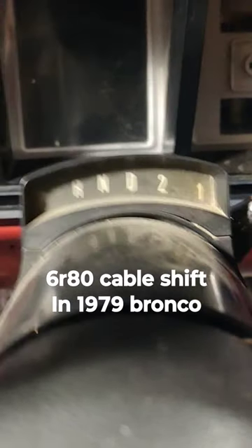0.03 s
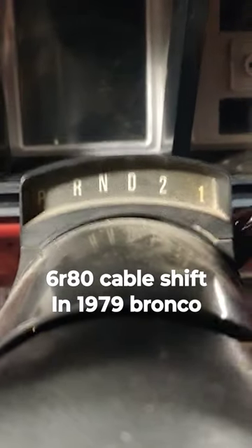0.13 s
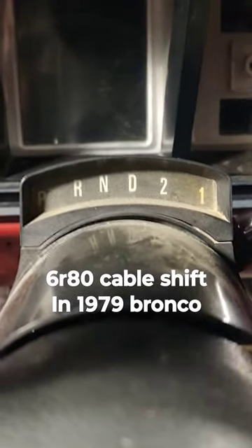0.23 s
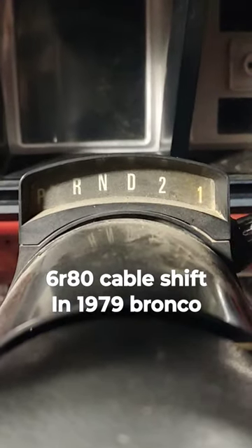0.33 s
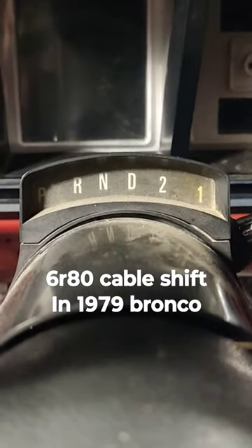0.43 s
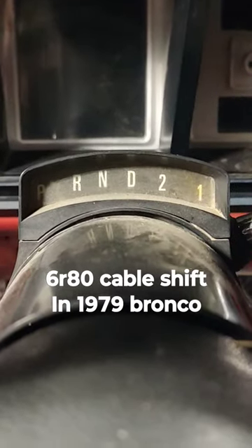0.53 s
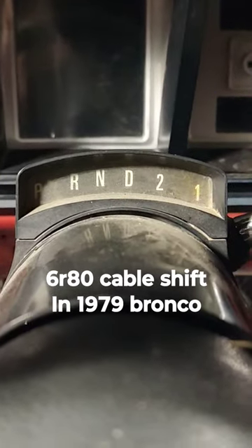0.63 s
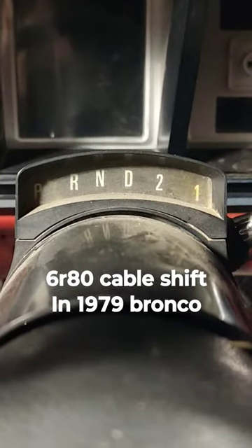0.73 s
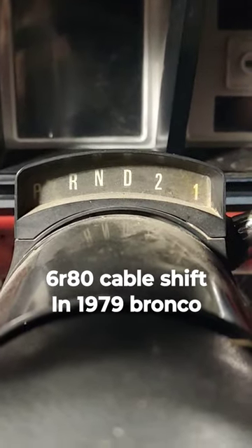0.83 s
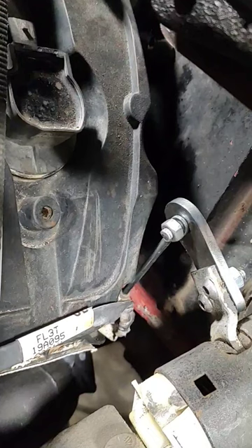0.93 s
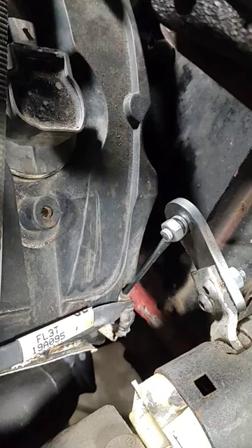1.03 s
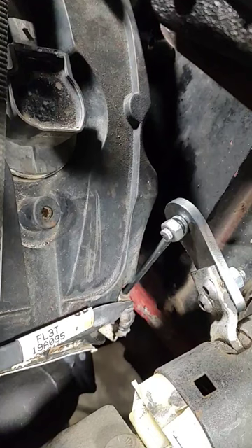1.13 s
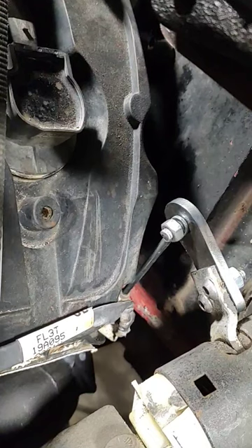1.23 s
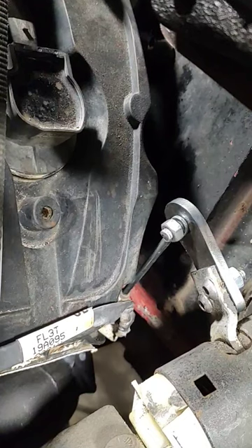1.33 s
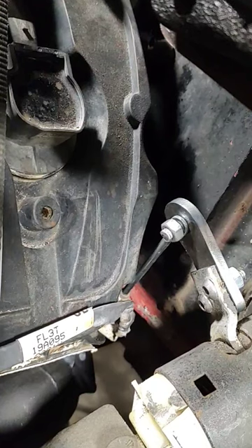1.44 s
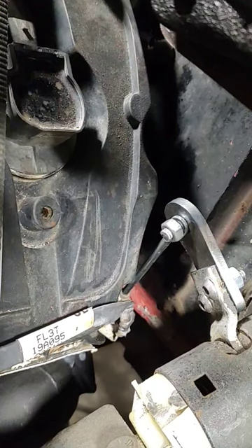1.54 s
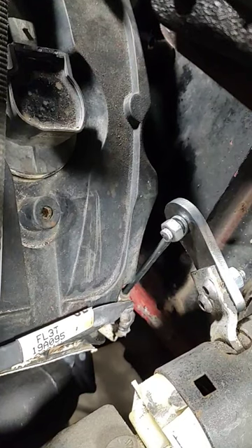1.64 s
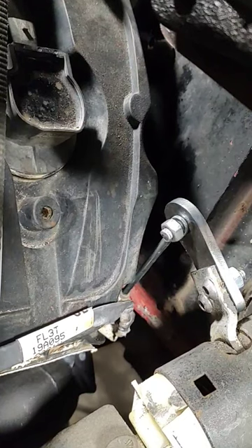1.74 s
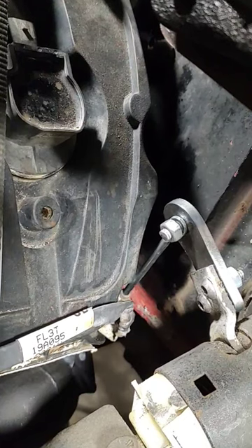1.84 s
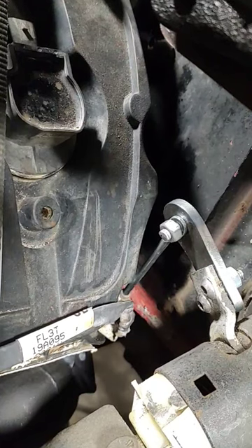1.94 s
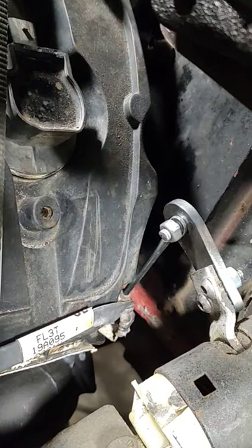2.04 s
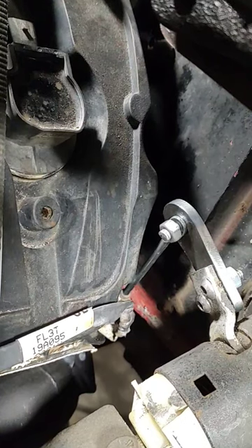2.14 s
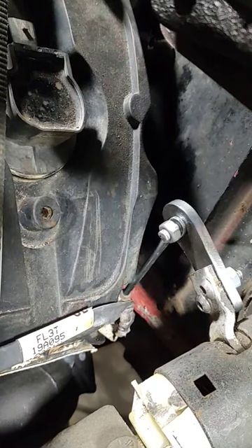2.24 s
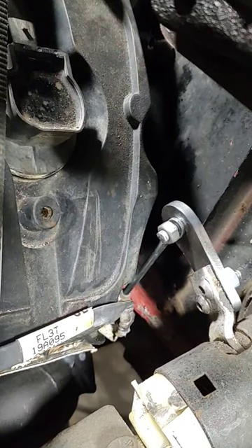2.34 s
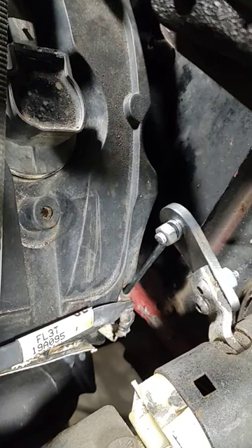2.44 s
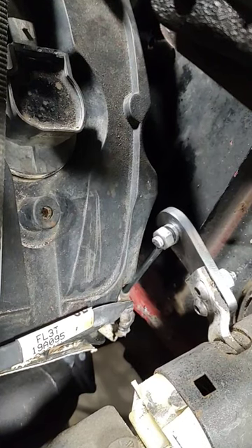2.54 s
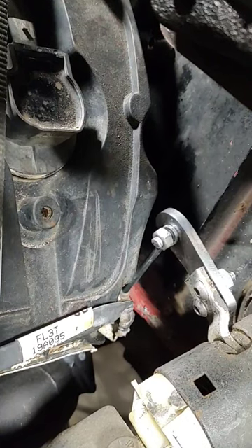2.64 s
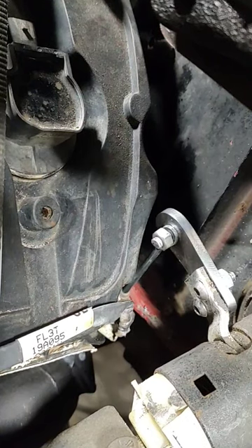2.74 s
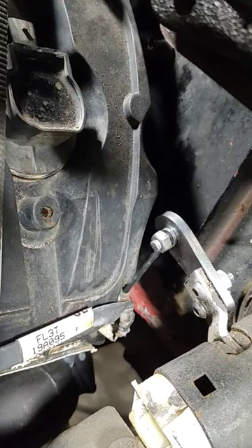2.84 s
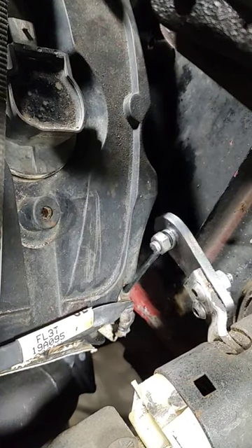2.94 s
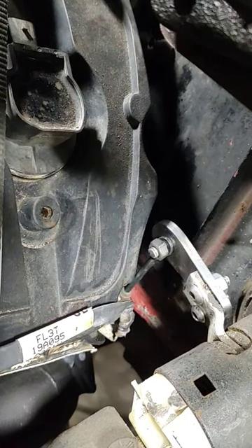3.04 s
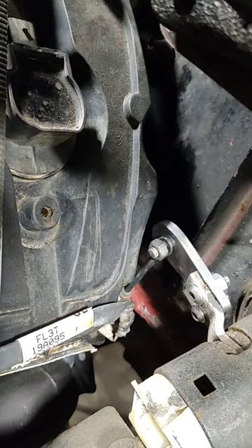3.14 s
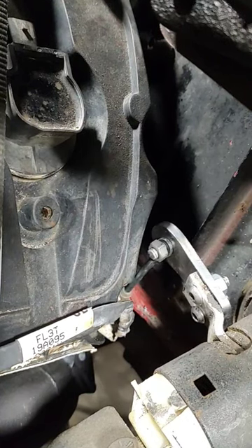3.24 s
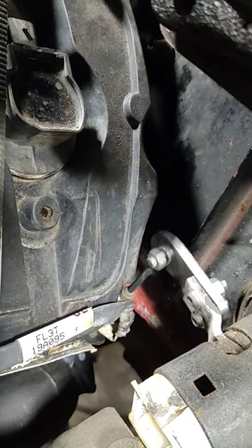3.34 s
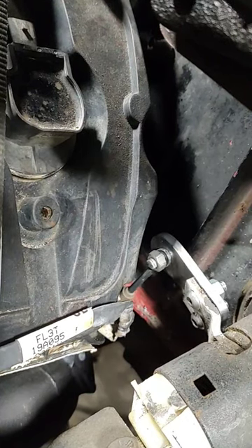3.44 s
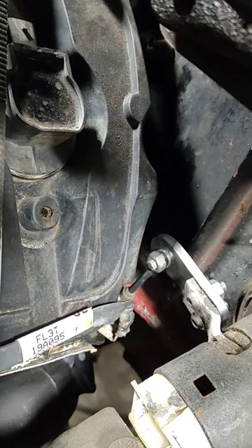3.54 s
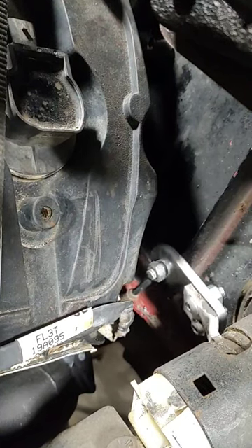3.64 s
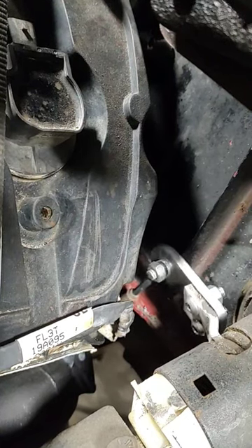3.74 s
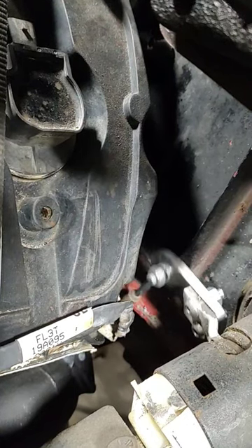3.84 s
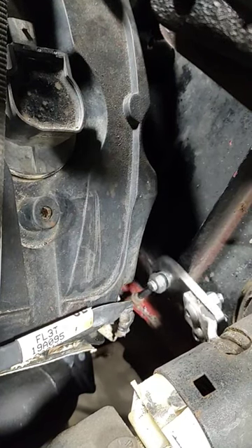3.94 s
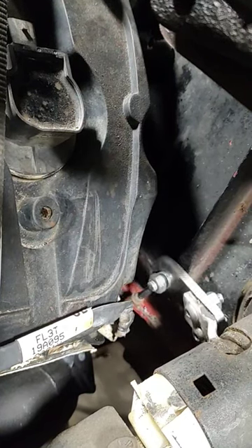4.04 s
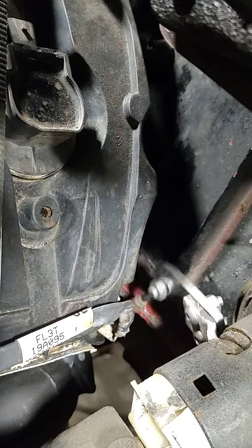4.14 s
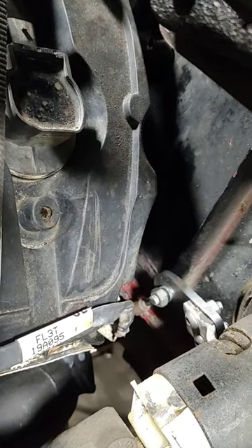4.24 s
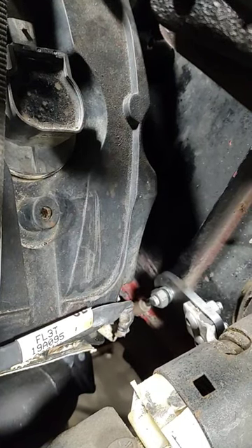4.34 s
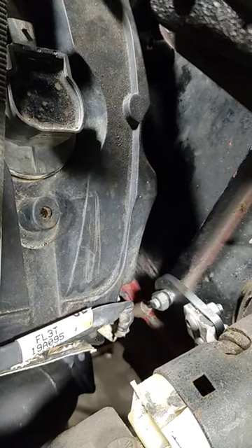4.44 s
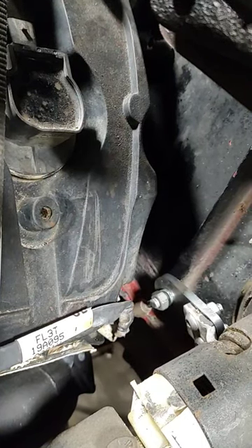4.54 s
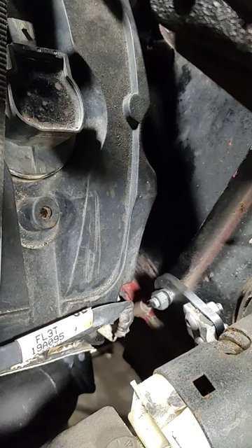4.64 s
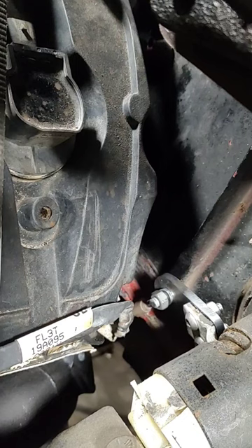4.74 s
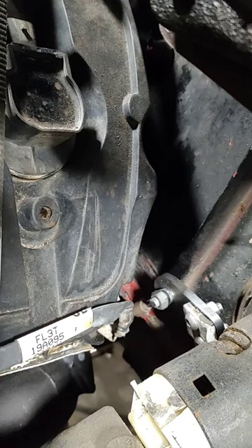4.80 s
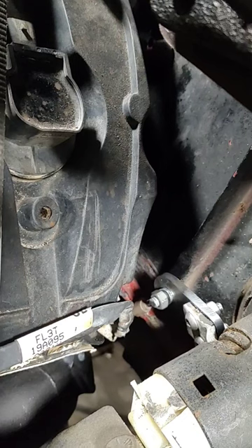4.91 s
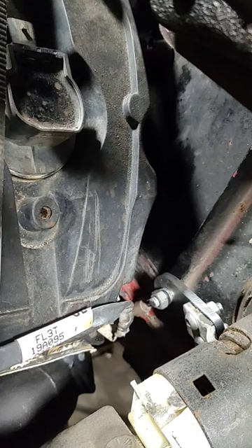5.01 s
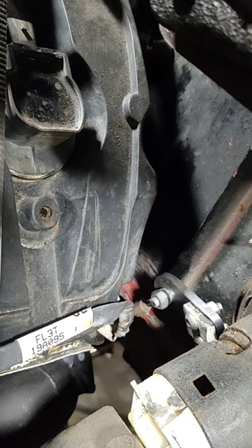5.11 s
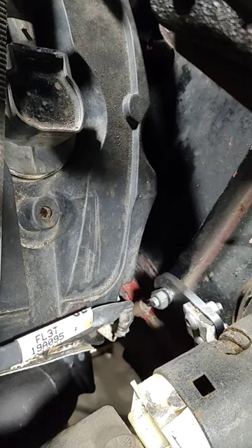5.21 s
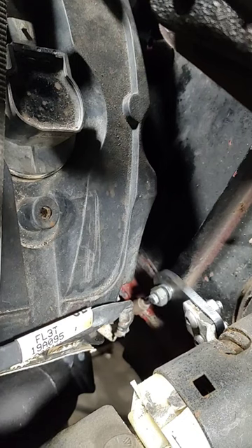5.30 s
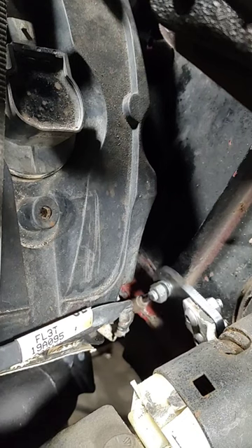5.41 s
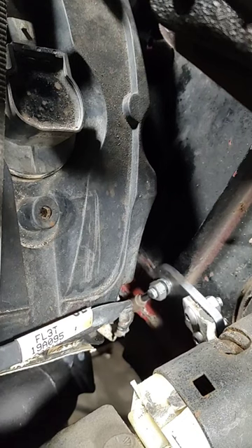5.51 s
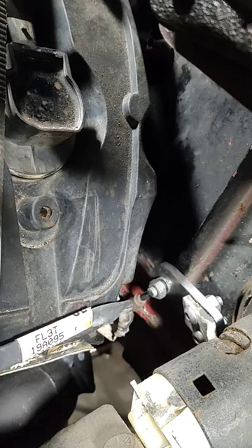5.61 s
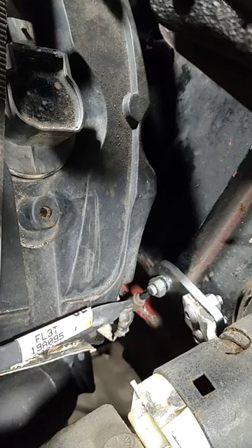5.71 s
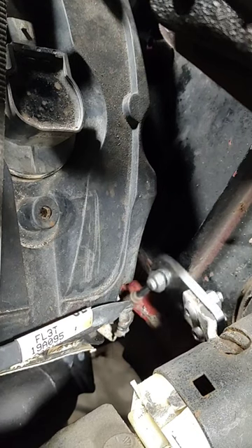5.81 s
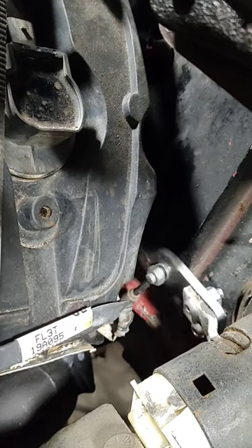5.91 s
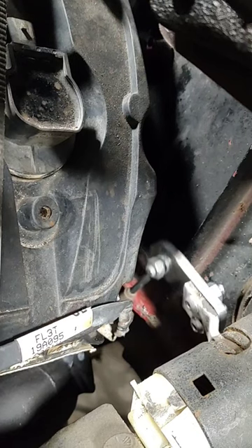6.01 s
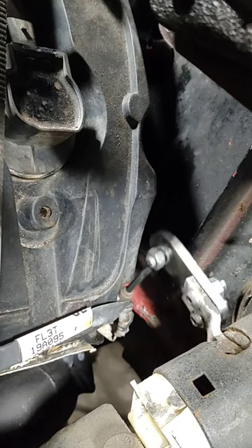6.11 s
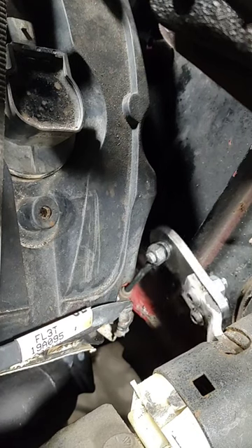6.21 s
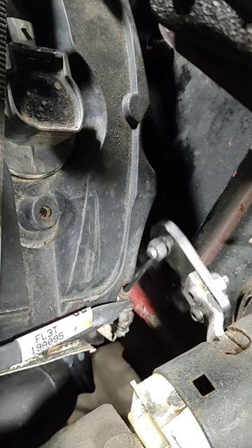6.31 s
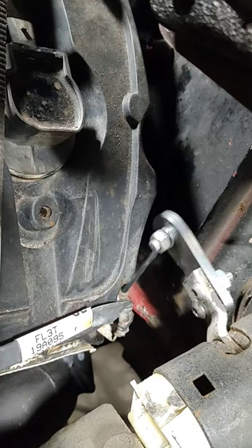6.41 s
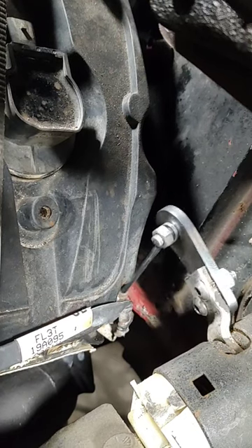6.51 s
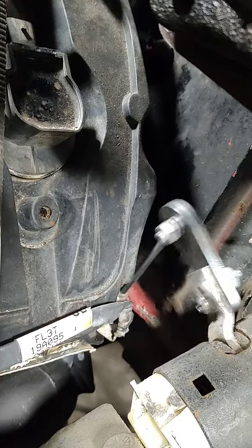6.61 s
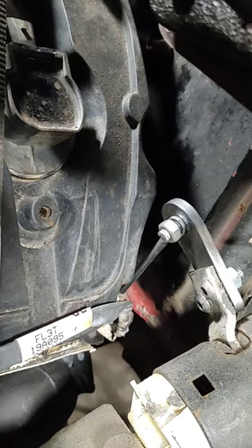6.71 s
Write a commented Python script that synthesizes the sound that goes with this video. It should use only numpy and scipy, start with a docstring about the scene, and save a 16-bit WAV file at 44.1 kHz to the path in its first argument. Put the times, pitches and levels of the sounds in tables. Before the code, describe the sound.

Quick loose shifter clatter, a tiny silence, then spaced hard metallic clacks of a gearbox linkage over a very faint workshop hum.

```python
"""A steel lever under a truck is pulled from detent to detent by a cable: each detent is a short chatter of contacts,
most with one firm knock as the part seats, ringing floor pan, gearbox case and brackets; between them the linkage
drags and shakes. Before that, and a short silence, a column gear lever is rattled in the cab: contacts ring shroud
and shift tube over a low boom. Filtered noise makes the room floor, wavering sines the hum of workshop lamps."""
import sys
import numpy as np
from scipy import signal
from scipy.fft import rfft, irfft, next_fast_len
from scipy.io import wavfile

SR = 44100
rng = np.random.default_rng(int(sys.argv[2]) if len(sys.argv) > 2 else 0)


def store_wav(level_fs):
    """Save 16-bit WAV to argv[1]."""
    pcm = np.round(np.clip(np.atleast_2d(level_fs), -1, 1) * 32767)
    wavfile.write(sys.argv[1], SR, pcm.T.astype(np.int16))


N = 298116
T_S = np.arange(N) / SR
HALF = np.array([[.5], [-.5]])   # splits a left-right difference over the channels
CAB_END_S, TRUCK_START_S = 0.84, 0.876   # silence between


def from_db(db):
    """Amplitude of a level in dB."""
    return np.exp(np.asarray(db) * (np.log(10) / 20))


def rms_one(x):
    """Scale to rms 1."""
    return x / np.sqrt(np.mean(x ** 2) + 1e-20)


def at_hz(points, hz):
    """Read a spectrum table on a log-frequency axis."""
    table_hz, values = np.transpose(points)
    return np.interp(np.log(hz), np.log(table_hz), values)


def shaped(x, gain):
    """Filter by a complex gain given as a function of Hz."""
    size = next_fast_len(N + SR)
    hz = np.maximum(np.fft.rfftfreq(size, 1 / SR), 1)
    return irfft(rfft(x, size) * gain(hz), size)[..., :N]


def band(x, low_hz, high_hz):
    """Butterworth band-pass."""
    return signal.sosfilt(signal.butter(2, [low_hz, high_hz], "band", fs=SR, output="sos"), x)


def highpass(x, hz):
    """Second-order Butterworth high-pass."""
    return signal.sosfilt(signal.butter(2, hz, "high", fs=SR, output="sos"), x)


def wander(knots_per_s):
    """Slow random curve: normal values joined by straight lines."""
    knots = rng.standard_normal(8 * knots_per_s)
    return np.interp(T_S, np.arange(len(knots)) / knots_per_s, knots)


def held(rows, column):
    """A column's value, held from each row's start to the next."""
    starts_s, values = np.array(rows)[:, [0, column]].T
    row = np.searchsorted(starts_s - .01, T_S) - 1
    return values[np.maximum(row, 0)]


def peak(at_s, db, swell_db_per_s, fade_db_per_s):
    """Envelope that swells to one moment and fades, straight in dB."""
    t_s = T_S - at_s
    return from_db(db + np.minimum(swell_db_per_s * t_s, -fade_db_per_s * t_s))


def contacts(per_s, spread_db, shared):
    """Random clicks of uneven size; a share is heard by both ports, the rest by one only; rms 1."""
    uneven_db = spread_db * np.minimum(rng.exponential(1, (3, N)), 4)
    sizes = from_db(uneven_db) * rng.choice([-1, 1], (3, N))
    clicks = sizes * (rng.random((3, N)) < per_s / SR)
    return rms_one(np.sqrt(shared) * clicks[0] + np.sqrt(1 - shared) * clicks[1:])


def blows(rows, column, rise_s, share=1):
    """Stereo force envelope: each blow rises quickly to its peak, then chatters out."""
    t_s = np.arange(SR // 4) / SR - .03
    out = np.zeros((2, N + SR))
    for row in rows:
        start_s, blow_db, chatter_s, left_right_db = row[0], row[1], row[4], row[5]
        decay_s = np.clip(share * chatter_s, .002, .05)
        shape = np.exp(np.minimum(t_s / rise_s, -t_s / decay_s))
        shape = shape * (1 + 0.5 * np.exp(-np.abs(t_s) / 0.00072))   # first contacts are hardest
        part_db = row[column] if column > 1 else 0   # parts are relative to the blow
        at = round((start_s + t_s[0] + rise_s) * SR)
        out[:, at:at + len(t_s)] += from_db(blow_db + part_db + HALF * left_right_db) * shape
    return out[:, :N]


# spectrum of bare contact noise: pitch_hz [Hz], density_db [dB per Hz, relative]
TICK_SPECTRUM = [(35, -56), (60, -25.5), (118, -34.5), (227, -6.5), (458, 9.5), (579, 7.5), (1040, 4),
                 (3420, -17.5), (6000, -35), (14900, -44.5), (16000, -30.5)]


def bare(force, low_hz, high_hz, per_s, spread_db, shared):
    """Contact noise that rings nothing: clicks through one short band-limited pulse."""
    impulse = np.eye(1, N, 64)[0]
    click = shaped(impulse, lambda hz: from_db(at_hz(TICK_SPECTRUM, hz)))
    click = band(band(click, low_hz, high_hz), low_hz, high_hz)[:4096]   # twice, for steep skirts
    click = click / np.sqrt(np.sum(click ** 2))
    clicks = force * contacts(per_s, spread_db, shared)
    return signal.fftconvolve(clicks, click[None], axes=1)[:, :N]


def resonate(x, hz, t60_s):
    """One damped mode as a two-pole resonator."""
    r, w = from_db(-60 / (t60_s * SR)), 2 * np.pi * hz / SR
    return signal.lfilter([0, np.sin(w)], [1, -2 * r * np.cos(w), r * r], x)


def ring(force, modes, per_s, spread_db, shared, favoured_hz=None, db_per_octave=0, shorter=1):
    """Contacts under a force envelope ring the modes; mode shares shift as the contact point moves."""
    hz, mode_db, t60_s = np.transpose(modes)
    t60_s = shorter * t60_s
    share_db = mode_db[:, None] + [2.5 * wander(8) for _ in modes]
    if favoured_hz is not None:
        share_db = share_db - db_per_octave * np.abs(np.log2(hz[:, None] / favoured_hz))
    share = from_db(share_db)
    loss = 1 - from_db(-60 / (t60_s * SR))
    power = np.sum(share ** 2 / (4 * loss[:, None]), axis=0)   # keeps the level when shares shift
    clicks = force * contacts(per_s, spread_db, shared) / np.sqrt(power) + 1e-18
    return sum(resonate((-1) ** k * share[k] * clicks, hz[k], t60_s[k]) for k in range(len(modes)))


# left-right likeness of diffuse sound: pitch_hz [Hz], likeness [0 to 1]
DIFFUSE_LIKENESS = [(60, .9), (300, .85), (650, .7), (1100, .05), (15000, .02)]


def diffuse(spectrum):
    """Stereo noise of rms 1, most alike in both channels in the bass."""
    mid, side = rng.standard_normal((2, N))
    mid = shaped(mid, lambda hz: spectrum(hz) * np.sqrt(1 + at_hz(DIFFUSE_LIKENESS, hz)))
    side = shaped(side, lambda hz: spectrum(hz) * np.sqrt(1 - at_hz(DIFFUSE_LIKENESS, hz)))
    return rms_one(mid + side * [[1], [-1]])


# room floor spectrum: pitch_hz [Hz], density_db [dB per Hz, relative]
FLOOR_SPECTRUM = [(30, -53.5), (70, -29), (120, -17), (200, -12.5), (400, -12.5), (900, -14.5),
                  (2000, -26.5), (3500, -23.5), (6000, -37.5), (10000, -41.5), (14500, -37.5), (16500, -42)]


def floor():
    """Distant room noise: diffuse noise under a fixed spectrum."""
    floor_db = -74
    return from_db(floor_db) * diffuse(lambda hz: from_db(at_hz(FLOOR_SPECTRUM, hz)))


# lamp ballast tones: pitch_hz [Hz], level_db [dB rms before waver and pan]
HUM_TONES = [(118.4, -87), (360.7, -68), (565.2, -86.5), (597.5, -86), (721.4, -94), (839.8, -101),
             (958.2, -91)]


def hum(waver_db, left_right_db):
    """Lamp ballasts: sines, each wavering in level."""
    out = 0
    for hz, level_db in HUM_TONES:
        level = np.sqrt(2) * from_db(level_db + waver_db * wander(14))
        out = out + level * np.sin(2 * np.pi * (hz * T_S + rng.random()))
    return out * from_db(HALF * left_right_db)


# reverberation before shortening: pitch_hz [Hz], t60_s [s]
REVERB_TIMES = [(80, 0.69), (250, 0.56), (700, 0.4), (2000, 0.36), (5000, 0.15), (12000, 0.3)]


def reverb(x, shorter):
    """Diffuse noise that dies band by band, convolved with the mono source."""
    t_s = np.arange(SR // 2) / SR
    edges_hz = 28 * 2 ** np.arange(0, 9.6, .5)   # half octaves
    white = diffuse(np.ones_like)[:, :len(t_s)]
    tail = 0
    for k, (low_hz, high_hz) in enumerate(zip(edges_hz, edges_hz[1:])):
        t60_s = shorter * at_hz(REVERB_TIMES, np.sqrt(low_hz * high_hz))
        tail = tail + (-1) ** k * band(white, low_hz, high_hz) * from_db(-60 * t_s / t60_s)
    tail = tail * np.minimum(t_s / 0.019, 1)   # first reflections take a moment
    tail = tail / np.sqrt(np.sum(tail ** 2) / 2)
    return signal.fftconvolve(x.mean(0)[None], tail, axes=1)[:, :N]


# between the two microphone ports: pitch_hz [Hz], left_lead_rad [rad]
PORT_LEAD = [(100, .01), (780, -.3), (1290, -2), (4400, -9), (16000, -30)]
# between the two microphone ports: pitch_hz [Hz], left_right_db [dB]
PORT_LEVELS = [(100, 0.5), (1000, -2.5), (8000, 0)]


def ports(x):
    """Two ports on a small housing hear a near source with different phase and level."""
    return shaped(x, lambda hz: from_db(HALF * at_hz(PORT_LEVELS, hz)) * np.exp(1j * HALF * at_hz(PORT_LEAD, hz)))


# lever sliding in the column; rows: column, metal, top, cab rumble
# sliding_db [dB], stopped_db [dB], settle_db_per_s [dB/s]
SLIDE_FORCES = [(-27, -43, 51.5), (-39.5, -59, 48), (-44.5, -72.5, 92), (-33, -40.5, 45)]
COLUMN_ROW, METAL_ROW, TOP_ROW, RUMBLE_ROW = range(4)


def sliding(layer):
    """Force of the lever sliding, stopping and settling."""
    end_s, stop_db_per_s = 0.16, 499.5
    sliding_db, stopped_db, settle_db_per_s = SLIDE_FORCES[layer]
    return peak(end_s, sliding_db, 0, stop_db_per_s) + peak(end_s, stopped_db, 0, settle_db_per_s)


# lever knocks in the column, levels before mixing: start_s [s], column_db [dB], metal_db [dB re column],
# top_db [dB re column], chatter_s [s], left_right_db [dB], favoured_hz [Hz, by the contact point]
COLUMN_KNOCKS = [(0.032, -5, -26.5, -30, 0.003, 7, 1860), (0.058, -23.5, -6.5, -25.5, 0.0079, 10, 1840),
                 (0.088, -8, -13.5, -27.5, 0.0043, 5.5, 1360), (0.116, -22, -10.5, -29.5, 0.0023, 3, 1600),
                 (0.137, -10.5, -28.5, -19.5, 0.0097, 10, 1310), (0.148, -26, 11, -15, 0.0048, 6.5, 1920),
                 (0.152, -19, 12.5, -3.5, 0.0062, 6.5, 1980), (0.202, -27, -7.5, -22, 0.012, 4.5, 2320),
                 (0.431, -31.5, -13.5, -52.5, 0.028, 3, 1210), (0.463, -51, 4, -9, 0.0076, 9, 1954),
                 (0.627, -36, -24, -35, 0.019, 0, 1440)]
# modes of column shroud and dash: pitch_hz [Hz], level_db [dB], t60_s [s]
SHROUD_MODES = [(230, -9, .04), (288, -4, .05), (343, -6, .05), (377, -1, .05), (497, -5, .04),
                (670, -8, .04)]
# shift tube modes before shortening: pitch_hz [Hz], level_db [dB], t60_s [s]
TUBE_MODES = [(1250, -3, .02), (1600, -2, .03), (1850, -1, .02), (2040, -6, .04), (2510, -5, .025),
              (2860, -6, .025), (3150, -7, .03), (4190, -13, .015), (4750, -11, .015)]
# modes of cab air and panels: pitch_hz [Hz], level_db [dB], t60_s [s]
CAB_MODES = [(40, -16, .12), (75, -7, .09), (108, -1, .09), (130, -3, .07), (175, -7, .07)]


def column_lever():
    """Knocks and sliding ring shroud and tube and tick bare; the slide booms in the cab below."""
    def force(column, layer):
        return from_db(-13.0) * blows(COLUMN_KNOCKS, column, rise_s=0.00078) + sliding(layer)

    clumps = from_db(1.8 * wander(120))   # the slide catches and slips
    heavy = force(1, COLUMN_ROW)
    sharp = force(2, METAL_ROW) * clumps
    sharpest = force(3, TOP_ROW) * clumps
    boom = ring(sliding(RUMBLE_ROW), CAB_MODES, 790, 5.3, 0.99)
    shroud = ring(heavy, SHROUD_MODES, 900, 0.92, 0.43)
    tube = ring(sharp, TUBE_MODES, 700, 3.2, 0.3, favoured_hz=held(COLUMN_KNOCKS, column=6),
                db_per_octave=9, shorter=0.57)
    dull_tick = from_db(-7.5) * bare(heavy, 230, 1400, 900, spread_db=4, shared=0.19)
    bright_tick = from_db(-1.0) * bare(sharp, 1400, 7200, 4000, spread_db=6.2, shared=0.05)
    top_tick = bare(sharpest, 5500, 16860, 16000, spread_db=0.99, shared=0.34)
    return boom + shroud + tube + dull_tick + bright_tick + top_tick


# touches that set one small part ringing: start_s [s], level_db [dB before flutter], pitch_hz [Hz], t60_s [s]
TOUCHES = [(.159, -25, 4750, .012), (.203, -39, 2550, .021), (.25, -57, 2050, .6),
           (.433, -58.5, 4190, .042), (.6, -81, 3170, .9), (.63, -66, 1600, .2), (2.729, -51, 3400, .046),
           (4.652, -35.5, 1770, .15), (4.656, -37.5, 1230, .06), (4.704, -46, 1795, .1),
           (4.752, -36, 1050, .041), (4.761, -50, 1770, .13), (5.38, -50, 3050, .06),
           (5.391, -45, 2700, .06), (5.393, -51.5, 1880, .031), (5.469, -50, 1480, .041),
           (5.528, -52, 1450, .04)]


def tinks():
    """Each touch rings one mode, fluttering and wavering in pitch as the loose part brushes its neighbour."""
    t_s = np.arange(2 * SR // 3) / SR
    out = np.zeros(N + SR)
    for start_s, level_db, hz, t60_s in TOUCHES:
        knots = rng.standard_normal((2, 100))
        flutter, waver = (np.interp(t_s, np.arange(100) / 140, k) for k in knots)
        phase = 2 * np.pi * np.cumsum(hz + 3.0 / t60_s * waver) / SR
        envelope = from_db(level_db - 60 * t_s / t60_s + 4.9 * flutter) * np.minimum(t_s / 0.003, 1)
        at = round(start_s * SR)
        out[at:at + len(t_s)] += envelope * np.sin(phase)
    return out[:N]


# detents and small linkage knocks, levels before mixing: start_s [s], case_db [dB], metal_db [dB re case],
# top_db [dB re case], chatter_s [s], left_right_db [dB], thump_db [dB re case],
# favoured_hz [Hz, by the contact point]
DETENT_BLOWS = [(0.965, -39.5, -7, -20, 0.043, -2, -7, 1770), (1.011, -55.5, 8, 5, 0.044, -3, -25, 2880),
                (1.531, -62.5, -7, -14, 0.0088, -3.5, -4.5, 3510),
                (1.858, -44, -3, -21, 0.017, -2, -5, 3930),
                (1.883, -40.5, -15, -42, 0.01, -24.5, -13.5, 1400),
                (1.956, -9, -25.5, -15.5, 0.0042, 11.5, -8.5, 2020),
                (2.072, -43.5, -21, -35, 0.023, -16, -14, 1876),
                (2.349, -46, -21, -38, 0.0056, -6.5, -13.5, 2004),
                (2.581, -13.5, -6.5, -18, 0.0097, -1.5, -13, 3540),
                (2.642, -33.5, -10, -29.5, 0.0091, -17.5, -17, 2070),
                (2.884, -32.5, -6, -30.5, 0.0071, -3, -20, 1540),
                (2.904, -50.5, 3, -21.5, 0.0059, -35.5, -14, 2090),
                (3.095, -13.5, -6.5, -17.5, 0.013, -5, -10.5, 1440),
                (3.416, -11.5, -9, -19, 0.015, -2, -12.5, 2500),
                (3.444, -40, -12, -21.5, 0.0057, -39, -12.5, 1600),
                (3.669, -43, -23, -32, 0.0018, -9, -12, 2020),
                (3.689, -9, -5.5, -17, 0.013, -2.5, -7, 1650), (3.956, -8, -8.5, -17, 0.0097, -2, -7, 2460),
                (4.253, -12.5, -8, -16, 0.012, -3.5, -9, 2940),
                (4.479, -49, -11, -27, 0.0078, -5.5, -4, 2680),
                (4.646, -45.5, 4, -44.5, 0.06, -3.5, -6.5, 1640),
                (4.746, -43.5, -15.5, -62.5, 0.014, -16, -1, 1657),
                (5.026, -53, -25.5, -35.5, 0.013, -4.5, -6.5, 1583),
                (5.356, -37, -8.5, -40, 0.012, -1, -5.5, 2090),
                (5.378, -28, -22, -47.5, 0.011, -3.5, -12.5, 2800),
                (5.526, -40, -19, -38, 0.0075, -2.5, -11.5, 1408),
                (5.91, -11.5, -9.5, -14, 0.014, -0.5, -8, 2610),
                (5.951, -33.5, -0.5, -23, 0.03, 3, -7.5, 2200),
                (6.108, -8, -9, -16.5, 0.012, -1.5, -13.5, 1700),
                (6.206, -10, -6.5, -17.5, 0.01, 2.5, -13.5, 2570),
                (6.418, -12.5, -8, -19, 0.013, -2.5, -10.5, 2900),
                (6.52, -12, -9, -19.5, 0.017, -1.5, -9, 2900),
                (6.718, -21.5, -3.5, -17, 0.022, -4.5, -13, 1950),
                (6.745, -48, -41, -48, 0.0085, 14, -13, 1960)]
# cable strokes, levels before mixing: peak_s [s], case_db [dB], metal_db [dB re case],
# swell_db_per_s [dB/s], fade_db_per_s [dB/s]
CABLE_DRAGS = [(1.04, -68.5, 7, 73, 170), (1.232, -53.5, -21.5, 198, 168.5), (1.552, -66, -9.5, 35, 46),
               (1.896, -55.5, -12.5, 475.5, 598.5), (2.51, -53.5, -19, 56, 299.5),
               (2.886, -30, -22, 544, 406), (4.668, -59, -9.5, 507, 124.5), (4.748, -47.5, -29, 146.5, 260),
               (5.238, -76, -21, 23.5, 65), (5.37, -76, -12.5, 901.5, 67), (5.542, -67, -23, 57, 178),
               (5.889, -57, -15.5, 73.5, 202), (6.731, -10.5, -18, 919, 400)]


def rubbing():
    """Forces of a faint swell just before each blow, loose linkage shaking after it, and cable strokes."""
    shake_delay_s, shake_case_db, shake_metal_db = 0.033, -20, -20.5   # case re blow, metal re its tick
    lead_s, lead_case_db, lead_metal_db, lead_db_per_s = 0.024, -25, -52, 803   # both re blow
    case = shaken = rubbed = 0
    for start_s, blow_db, metal_db, *_ in DETENT_BLOWS:
        shake_s, swell_s = start_s + shake_delay_s, start_s - lead_s
        case = case + peak(shake_s, blow_db + shake_case_db, 800, 165.5)
        case = case + peak(swell_s, blow_db + lead_case_db, lead_db_per_s, 800)
        shaken = shaken + peak(shake_s, blow_db + metal_db + shake_metal_db, 660, 180.5)
        rubbed = rubbed + peak(swell_s, blow_db + lead_metal_db, lead_db_per_s, 800)
    for peak_s, case_db, metal_db, swell_db_per_s, fade_db_per_s in CABLE_DRAGS:
        case = case + peak(peak_s, case_db, swell_db_per_s, fade_db_per_s)
        rubbed = rubbed + peak(peak_s, case_db + metal_db, swell_db_per_s, fade_db_per_s)
    return case, shaken, rubbed


# firm contact inside a chatter: start_s [s], case_db [dB], metal_db [dB re case], rebound_db [dB re seat]
SEAT_KNOCKS = [(1.958, -18.5, -0.5, -6), (2.587, -20.5, -15, -10), (2.905, -43, 11, -17),
               (3.101, -18.5, -7, -10), (3.421, -24.5, -13, -6.5), (3.442, -29.5, 6, -8),
               (3.692, -15, -17, -5), (3.958, -16.5, -12, -8), (4.256, -17.5, -7.5, -12.5),
               (5.914, -16, -6.5, -2.5), (6.110, -16, -10, -1), (6.210, -20.5, -12, 2),
               (6.422, -21.5, 0, -11), (6.526, -17, -4.5, -4), (6.745, -22.5, -16, -17)]
# body loading by lever position: start_s [s], pan_favoured_hz [Hz], case_favoured_hz [Hz]
LEVER_LOADING = [(0.9, 393, 770), (1.85, 345, 590), (2.58, 340, 760), (3.09, 421, 675), (3.69, 317, 640),
                 (3.95, 276, 650), (4.25, 340, 660), (4.64, 287.4, 630), (5.36, 362, 500),
                 (5.91, 316.5, 670), (6.1, 335, 670), (6.2, 424, 600), (6.41, 380, 820), (6.52, 358, 670),
                 (6.71, 386, 610)]
# floor pan modes before shortening: pitch_hz [Hz], level_db [dB], t60_s [s]
PAN_MODES = [(72, -8, .2), (118, -3, .18), (175, -9, .1), (232, -7, .1), (264, -7, .22), (290, -3, .11),
             (340, 0, .07), (376, -4, .07), (413, -4, .07)]
# gearbox case modes before shortening: pitch_hz [Hz], level_db [dB], t60_s [s]
CASE_MODES = [(525, -14, .06), (576, -1, .06), (603, -13, .25), (665, -6, .06), (686, -2, .08),
              (725, -3, .06), (765, -8, .07), (895, -6, .09), (948, -9, .1)]
# lever and bracket modes before scaling: pitch_hz [Hz], level_db [dB], t60_s [s]
METAL_MODES = [(1170, -1, .08), (1380, -3, .03), (1610, -3, .04), (1770, -4, .07), (1970, -3, .04),
               (2140, -5, .11), (2305, -5, .09), (2600, -4, .03), (2740, -6, .05), (2960, -6, .04),
               (3385, -4, .045), (3800, -7, .05), (4650, -8, .03), (5340, -9, .035)]


def seats():
    """A seat and its rebound strike all modes at once, most strongly those favoured at that moment."""
    rebound_s, pan_db, ring_share, spread_db = .006, -9, 0.68, 0.5   # pan re case; spread over modes
    start_s, case_db, metal_db, rebound_db = np.transpose(SEAT_KNOCKS)
    at = np.round(start_s * SR).astype(int)
    rebound_at = at + round(rebound_s * SR)
    parts = ((PAN_MODES, pan_db, held(LEVER_LOADING, column=1)),
             (CASE_MODES, 0, held(LEVER_LOADING, column=2)),
             (METAL_MODES, metal_db, held(DETENT_BLOWS, column=7)))
    out = 0
    for modes, part_db, favoured_hz in parts:
        hz, mode_db, t60_s = np.transpose(modes)
        share = from_db(mode_db - 4.1 * np.abs(np.log2(hz / favoured_hz[at, None])))
        gain = 2 * from_db(case_db + part_db)[:, None] * share / share.sum(1, keepdims=True)
        spread = from_db(spread_db * rng.standard_normal((len(at), len(modes), 2)))
        for k in range(len(modes)):
            clicks = np.full(N + SR, 1e-18)
            clicks[at] += gain[:, k] * spread[:, k, 0]
            clicks[rebound_at] += gain[:, k] * spread[:, k, 1] * from_db(rebound_db)
            out = out + resonate(clicks[:N], hz[k], ring_share * t60_s[k])
    return band(band(out, 210, 7000), 210, 7000)


def linkage():
    """Heavy contacts thump the floor pan and ring the case, sharp ones the brackets; the sharpest only tick."""
    pan_ring, case_ring, metal_ring = .85, 1, .9   # share of t60 left by dirt and grease
    shake, shaken, rubbed = rubbing()
    shaken = shaken * from_db(2.3 * wander(90))   # rattling comes in clusters
    pan_hz, case_hz = held(LEVER_LOADING, column=1), held(LEVER_LOADING, column=2)
    metal_hz = held(DETENT_BLOWS, column=7)

    # the pan feels only the first part of a chatter
    thump = from_db(2.5) * blows(DETENT_BLOWS, column=6, rise_s=0.00082, share=.5)
    thump = thump + from_db(held(DETENT_BLOWS, column=6) - 0.5) * shake
    heavy = from_db(-11.0) * blows(DETENT_BLOWS, column=1, rise_s=0.00037) + from_db(-18.5) * shake
    sharp = from_db(-6.5) * blows(DETENT_BLOWS, column=2, rise_s=0.0029)
    sharp = sharp + from_db(-14) * shaken + from_db(-9.5) * rubbed
    sharpest = from_db(3.5) * blows(DETENT_BLOWS, column=3, rise_s=0.0019)
    sharpest = sharpest + from_db(0.24 * held(DETENT_BLOWS, column=3) - 5) * (shaken + rubbed)
    struck = from_db(-11.0) * blows(DETENT_BLOWS, column=2, rise_s=0.0075) + from_db(-12.5) * rubbed

    pan = ring(thump, PAN_MODES, 1500, 3.9, 1.0, favoured_hz=pan_hz, db_per_octave=14.5, shorter=pan_ring)
    case = ring(heavy, CASE_MODES, 2000, 0.7, 0.94, favoured_hz=case_hz, db_per_octave=20.5, shorter=case_ring)
    case = band(case, 160, 1600)
    metal = ring(struck, METAL_MODES, 4000, 2.5, .45, favoured_hz=metal_hz, db_per_octave=11, shorter=metal_ring)
    # shaking favours one pitch and lets the metal ring longer
    metal = metal + ring(from_db(-3.5) * shaken, METAL_MODES, 460, 6, 0.2, favoured_hz=2150,
                         db_per_octave=3, shorter=1.7)
    metal = band(metal, 900, 5500)
    dull_tick = from_db(-2.0) * bare(heavy, 210, 1100, 1800, spread_db=3.5, shared=0.78)
    bright_tick = bare(sharp, 1200, 2800, 1800, spread_db=4.6, shared=0.074)
    top_tick = bare(sharpest, 3620, 15000, 8000, spread_db=4.1, shared=0.077)
    near = seats() + pan + case + metal + dull_tick + bright_tick + top_tick
    return highpass(near, 75)   # little deep bass remains


def scene():
    """Cab, silence, then under the truck."""
    cab_reverb_db, shop_reverb_db, cab_shelter_db = -20.5, -15, -2.5
    in_cab = T_S < TRUCK_START_S
    cab = column_lever()
    under = linkage() + tinks() * [[1], [1]]   # tinks sound in both places
    cab = ports(cab) + from_db(cab_reverb_db) * reverb(cab, 0.95)
    under = ports(under) + from_db(shop_reverb_db) * reverb(under, 0.85)
    shop = floor() + hum(waver_db=1.5, left_right_db=-3.0)
    shop = from_db(cab_shelter_db * in_cab) * shop   # the cab muffles the workshop
    outside_silence_s = np.maximum(CAB_END_S - T_S, T_S - TRUCK_START_S)
    sounding = np.clip(outside_silence_s / 0.0036, 0, 1)
    return sounding * (cab * in_cab + under + shop)


def record(dry):
    """The deepest bass is lost, peaks are rounded, a faint self-noise is added, the top is cut."""
    ceiling, hiss_db, cutoff_hz = .65, -105, 16900   # ceiling in full scale
    dry = highpass(dry, 70)
    dry = ceiling * np.tanh(dry / ceiling)
    hiss = from_db(hiss_db) * rng.standard_normal(dry.shape)
    return signal.sosfilt(signal.cheby2(12, 70, cutoff_hz, fs=SR, output="sos"), dry + hiss)


dry = scene()
out = record(dry)
store_wav(out)
```